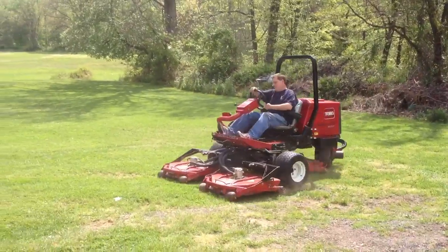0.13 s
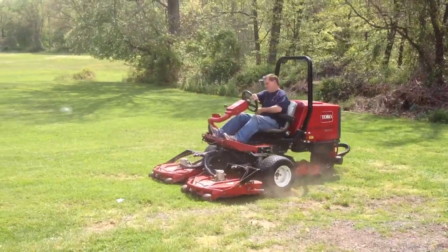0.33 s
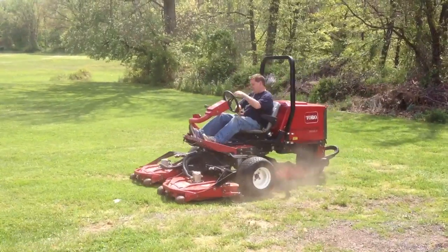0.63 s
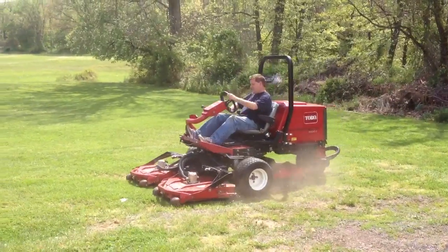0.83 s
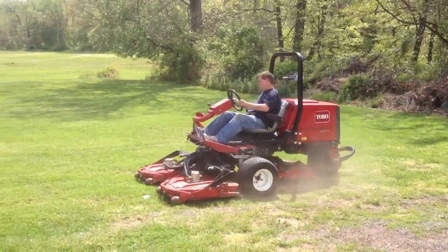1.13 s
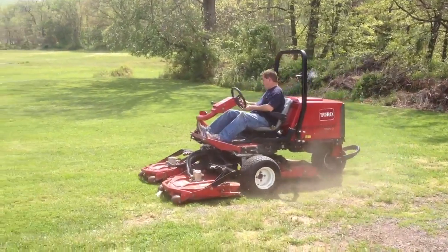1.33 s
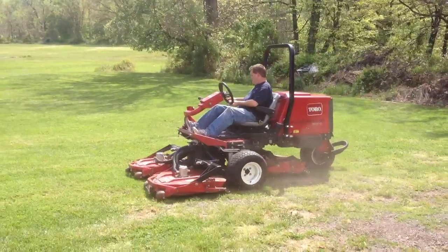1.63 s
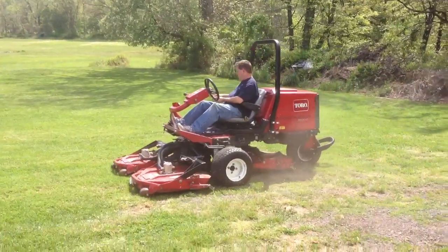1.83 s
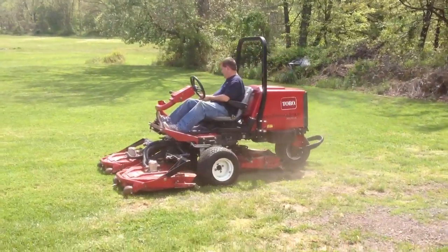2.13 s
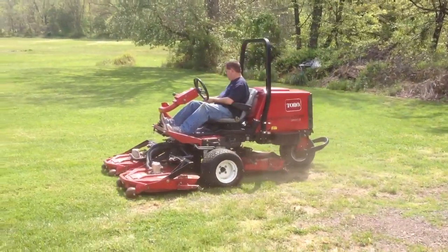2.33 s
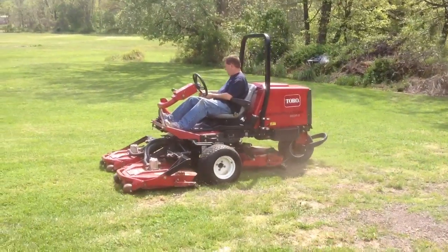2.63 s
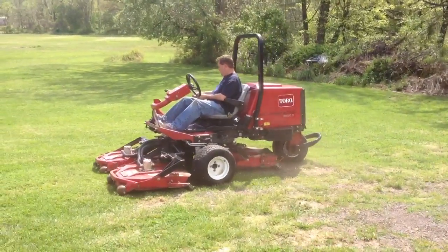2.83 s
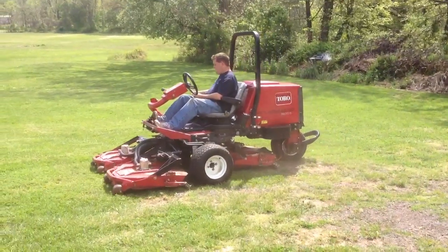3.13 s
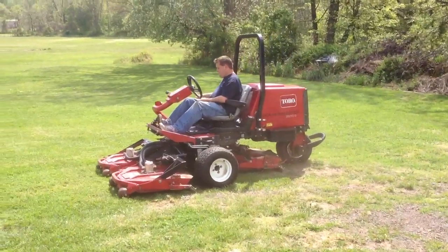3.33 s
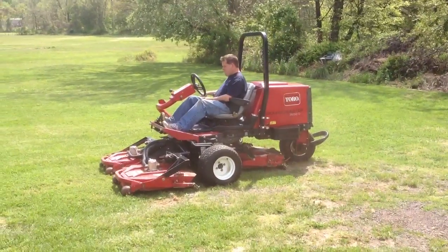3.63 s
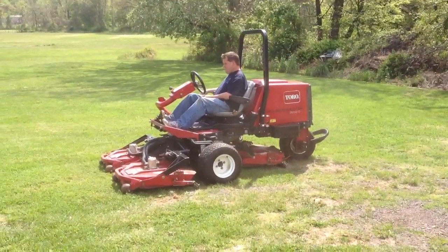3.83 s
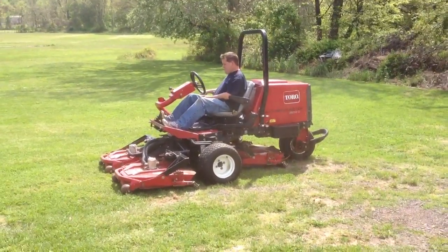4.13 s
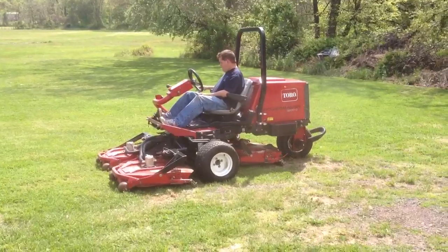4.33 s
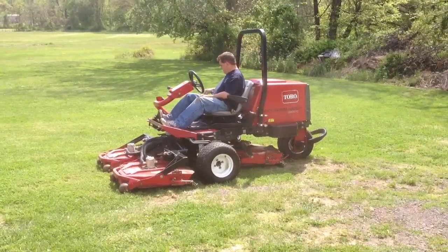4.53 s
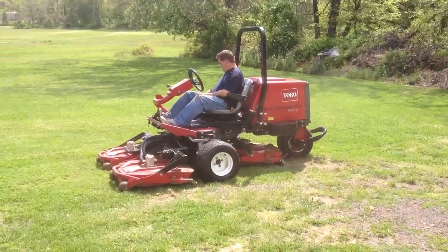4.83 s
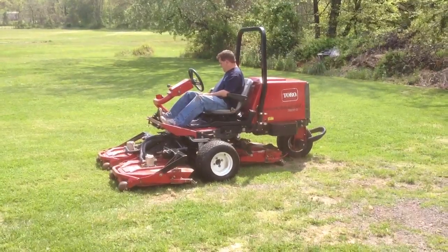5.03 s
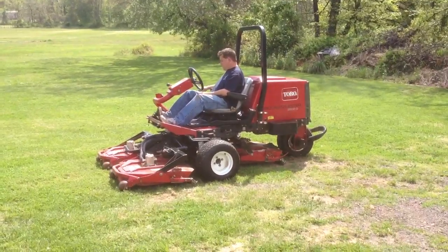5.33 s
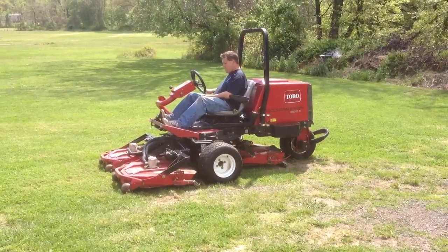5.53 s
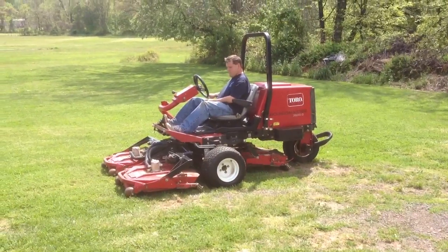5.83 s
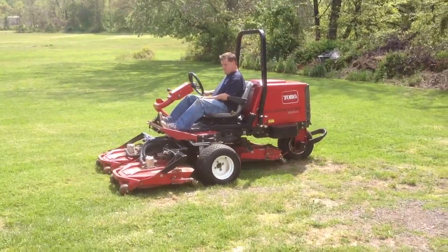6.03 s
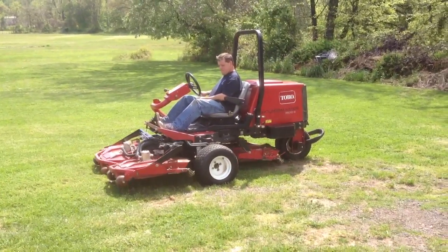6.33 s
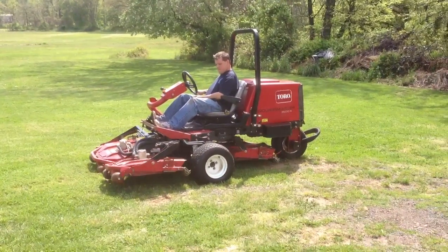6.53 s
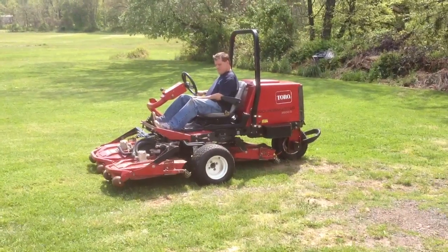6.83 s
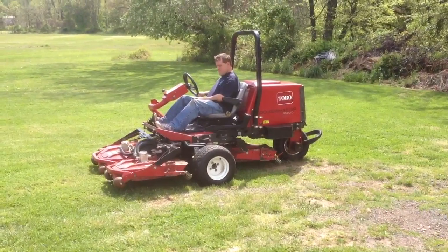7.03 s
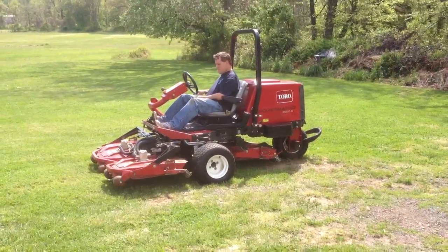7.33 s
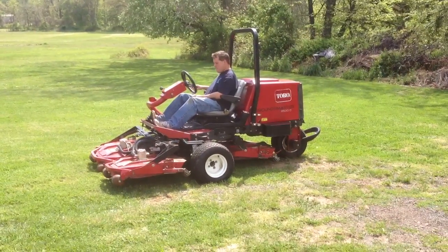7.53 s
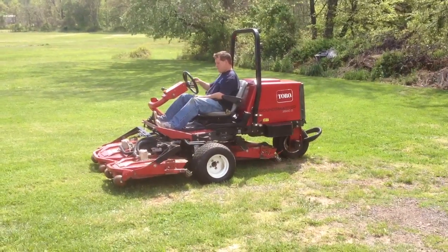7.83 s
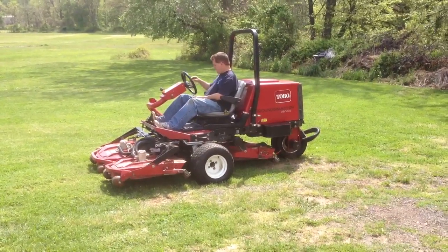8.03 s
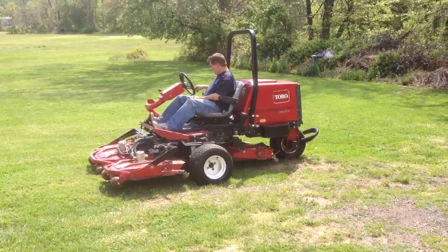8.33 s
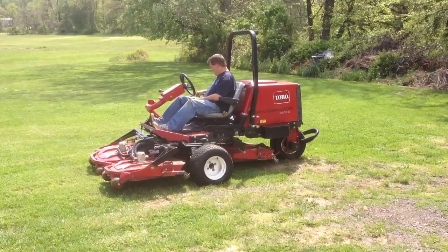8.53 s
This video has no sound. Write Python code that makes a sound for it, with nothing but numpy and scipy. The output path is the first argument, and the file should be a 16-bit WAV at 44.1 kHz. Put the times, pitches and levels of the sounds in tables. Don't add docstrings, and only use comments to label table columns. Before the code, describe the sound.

Loud mower decks and rumbling engine under gusty wind blasts; blades switch off midway, a lever clanks, and the quieter engine runs on.

```python
import sys
import numpy as np
from scipy import signal
from scipy.fft import rfft, irfft, next_fast_len
from scipy.io import wavfile
from scipy.ndimage import uniform_filter1d

SR = 44100
rng = np.random.default_rng(int(sys.argv[2]) if len(sys.argv) > 2 else 0)


def gain_from_db(level_db):
    decades = np.asarray(level_db, float) / 20
    return 10 ** decades


def store_wav(level_fs):
    pcm = np.round(np.clip(np.atleast_2d(level_fs), -1, 1) * 32767)
    wavfile.write(sys.argv[1], SR, pcm.T.astype(np.int16))


N = 382347

# (time [s], level [dB])
DECKS = [
    (0, -31.5),
    (.43, -32.5),
    (.8, -31),
    (1.57, -29),
    (2.28, -28.5),
    (2.5, -36),
    (3.0, -34.5),
    (3.5, -35.5),
    (4.8, -34.5),
    (5.05, -33.5),
]
# (time [s], pitch [Hz], level [dB])
MOTOR = [(.3, 364, -37.5), (1, 365.2, -32.5), (2.2, 369.6, -29.5), (3.2, 374.5, -31.5), (3.9, 369.3, -35),
         (4.94, 369.5, -31), (5.06, 367.8, -40), (5.15, 368, -33), (5.32, 370, -33), (5.45, 370, -42)]
# (centre [Hz], width [Hz], boost [dB])
PANELS = [(800, 525, 13.5), (1456, 335, 8), (2098, 176, 5.5), (2246, 59, 9), (3830, 240, 6), (4870, 730, 7),
          (7265, 550, 10), (8064, 530, 12.5), (7500, 110, 7), (7910, 95, 5), (8700, 400, 3),
          (9180, 200, -9), (9830, 700, 1.5), (13400, 1300, -0.5)]
MEAN_RUSH_DB = -31
FIRING_HZ = 72.63


def rms_one(x):
    return x / np.sqrt(np.mean(x ** 2) + 1e-20)


def in_time(rows):
    s, *columns = np.transpose(rows)
    return [np.interp(np.arange(N) / SR, s, c) for c in columns]


def while_on(rows):
    end_s, end_hz = rows[-1][:2]
    return in_time([*rows, (end_s + .06, end_hz, -90)])


def drift(rate):
    r = np.exp(-80 * np.pi * rate / SR)
    noise = rng.standard_normal(N // 40 + 2002)
    slow = signal.lfilter([1], [1, -2 * r, r * r], noise)[2000:]
    return np.interp(np.arange(N) / 40, np.arange(len(slow)), rms_one(slow - slow.mean()))


def coloured(slope, panels=(), source=None, ripple_db=0):
    size = next_fast_len(N)
    hz = np.arange(size // 2 + 1) * SR / size + 1e-3
    at, db = np.transpose(slope)
    shape_db = np.interp(np.log(hz), np.log(at), db, left=-120, right=-120)
    ripple = np.interp(hz / 22, np.arange(1100), rng.standard_normal(1100))
    shape_db = shape_db + ripple_db * ripple
    for centre, width, boost_db in panels:
        shape_db = shape_db + boost_db / (1 + (2 * (hz - centre) / width) ** 2)
    source = rng.standard_normal(N) if source is None else source
    return rms_one(irfft(rfft(source, size) * gain_from_db(shape_db), size)[:N])


def band(x, low_hz, high_hz):
    edges = [low_hz, min(high_hz, .45 * SR)]
    return signal.sosfilt(signal.butter(2, edges, "band", fs=SR, output="sos"), x)


def evened(x, window_s):
    return x / np.sqrt(uniform_filter1d(x ** 2, round(window_s * SR)) + 0.3)


def bump(s, length_ms):
    half = length_ms * SR / 2000
    first, last = max(0, int(s * SR - 4 * half)), min(N, int(s * SR + 4 * half))
    at = np.arange(first, last)
    return at, np.exp(-np.log(2) / 2 * ((at - s * SR) / half) ** 2)


def bells(rows):
    power = np.zeros(N)
    for s, db, length_ms in rows:
        at, bell = bump(s, 0.74 * length_ms)
        power[at] += (gain_from_db(db) * bell) ** 2
    return np.sqrt(power)


def tone(hz, rough, waver_rate):
    phase = 2 * np.pi * np.cumsum(hz) / SR + rough * drift(waver_rate)
    return np.sqrt(2) * np.sin(phase) * gain_from_db(2.4 * rough * drift(waver_rate))


def firing(depth):
    turns = np.cumsum(FIRING_HZ * (1 + 0.0055 * drift(1.7))) / SR
    cylinder = gain_from_db(np.array([0., -3., -1.5]))[turns.astype(int) % 3]
    return rms_one(1 + depth * cylinder * np.exp(-3.5 * (turns % 1)))


def blade_speed():
    off_s, coast_s = 4.935, .94
    return np.exp(-np.maximum(np.arange(N) / SR - off_s, 0) / coast_s)


def decks():
    # (frequency [Hz], density [dB per Hz])
    thrum_slope = [(24, -87), (40, -91), (139, -4), (209, -5.5), (337, -5.5), (373, -6), (413, -10),
                   (600, -24), (780, -30), (1320, -120)]
    rush_slope = [(400, -16), (700, -7.5), (1100, -3.5), (2000, -6.5), (3200, -12.5), (5000, -13.5),
                  (6300, -19), (9000, -31.5), (15000, -36)]
    # (time [s], roughness [0-1])
    motor_rough = [(0, 1.0), (2.3, 1.0), (3.2, .35), (5.5, .3)]
    # (time [s], pitch [Hz], level [dB])
    beat_low = [(.3, 210.7, -45), (1, 210, -32), (2.2, 207.7, -34), (3.2, 212, -33.5), (4, 217.4, -40),
                (5, 215.5, -31.5)]
    beat_high = [(.3, 287, -32), (1, 283.5, -30.5), (2.2, 285.7, -26), (3.2, 283.7, -44), (4, 270, -38),
                 (4.85, 264.8, -33)]
    speed = blade_speed()
    work_db = in_time(DECKS)[0] - MEAN_RUSH_DB
    coast_db = 2.76 * 20 * np.log10(speed)
    rush_db = MEAN_RUSH_DB + work_db + coast_db
    thrum_db = -24.5 + 0.86 * work_db + coast_db
    shell_db = -28 + 1.46 * (work_db + coast_db)
    gusty = 0.86 * drift(7.8)

    rush = coloured(rush_slope, PANELS, ripple_db=1.5) * firing(0.15)
    shell = rms_one(band(rush, 355, 1014)) * gain_from_db(shell_db + gusty + 0.9 * drift(24))
    air = rms_one(band(rush, 1090, 6970)) * gain_from_db(rush_db + gusty + 0.5 * drift(26))
    thrum = coloured(thrum_slope) * gain_from_db(thrum_db - 6.0 + 2.5 * np.tanh(drift(9.4)))

    hz, level_db = while_on(MOTOR)
    hz = hz * speed
    octave = gain_from_db(-17.5) * tone(2 * hz, 0.84, 4.3)
    hum = gain_from_db(level_db) * (tone(hz, in_time(motor_rough)[0], 10) + octave)
    looped = cycle_pattern(hz)
    looped_rush = coloured(rush_slope, PANELS, source=looped)
    hum = hum + gain_from_db(rush_db - 5) * rms_one(band(looped_rush, 1480, 3500))
    hum = hum + gain_from_db(thrum_db - 11) * coloured(thrum_slope, source=looped)
    for rows in (beat_low, beat_high):
        hz, level_db = while_on(rows)
        hum = hum + gain_from_db(level_db) * tone(hz, 1.2, 10)
    return thrum + shell + air + hum + gain_from_db(rush_db) * gear_whine(speed)


def cycle_pattern(hum_hz):
    turns = np.cumsum(hum_hz / 15) / SR
    orders = gain_from_db(3.5 * rng.standard_normal(301)) * np.exp(2j * np.pi * rng.random(301))
    return np.interp(turns % 1, np.arange(600) / 600, irfft(orders), period=1)


def gear_whine(speed):
    # (time [s], tooth rate [Hz])
    tooth_rate = [(2.2, 421.8), (3.4, 427.3), (4.9, 426.2)]
    # (multiple of the tooth rate, level against the air rush [dB])
    gear_orders = [(7, -29), (8, -31), (9, -26), (10, -29)]
    hz = in_time(tooth_rate)[0] * speed * (1 + .0012 * drift(5))
    phase = 2 * np.pi * np.cumsum(hz) / SR
    return np.sqrt(2) * sum(gain_from_db(db) * np.sin(k * phase) for k, db in gear_orders)


def blade_passes():
    # (multiple of a third of the motor pitch, level against the motor [dB])
    blade_orders = [(5, -15), (7, -15)]
    hz, level_db = while_on(MOTOR)
    speed = blade_speed()
    third = hz * speed / 3
    return gain_from_db(level_db) * speed * sum(gain_from_db(db) * tone(k * third, 1.1, 9) for k, db in blade_orders)


def engine():
    # (time [s], level [dB])
    effort = [
        (0, -50),
        (.46, -43),
        (2, -42),
        (3, -39.5),
        (3.9, -35),
        (4.8, -33.5),
        (5.1, -44),
        (6, -40.5),
        (8.67, -43),
    ]
    # (frequency [Hz], density [dB per Hz])
    rumble_slope = [(40, -59), (80, -7), (130, 1), (200, 6), (320, -2.5), (450, -16.5), (700, -59)]
    clatter_slope = [(300, -39), (600, -3), (1100, -9.5), (2000, 2.5), (3200, -5), (5000, -9.5),
                     (6500, -18), (9000, -34)]
    hiss_slope = [(4000, 0), (6000, -7.5), (8000, -3.5), (9200, 1), (11700, -9), (12800, -4), (14400, -2.5),
                  (15500, -11)]
    # (pitch [Hz], level [dB])
    pump_whines = [(380, -57), (655, -55), (861, -56.5), (7900, -77)]
    rumble_db, clatter_db = -38, in_time(effort)[0]
    loaded_db = 4.5 + 0.29 * (in_time(DECKS)[0] - MEAN_RUSH_DB)
    hiss_db = -51 + loaded_db * blade_speed() ** 10.0

    rumble = coloured(rumble_slope) * gain_from_db(rumble_db + 2.1 * drift(24))
    clatter = coloured(clatter_slope, PANELS, ripple_db=-0.5) * firing(0.58)
    clatter = clatter * gain_from_db(clatter_db + 1.0 * drift(30))
    hiss = coloured(hiss_slope, PANELS, ripple_db=4.5) * firing(.2) * gain_from_db(hiss_db + 0.37 * drift(26))
    whine = sum(gain_from_db(db) * tone(np.full(N, hz), 1.1, 8) for hz, db in pump_whines)
    pulses = exhaust_pulses()
    beat = gain_from_db(rumble_db - 7.0) * coloured(rumble_slope, source=pulses)
    knock = gain_from_db(clatter_db - 34.0) * coloured(clatter_slope, PANELS, source=pulses)
    return rumble + clatter + hiss + whine + beat + knock


def exhaust_pulses():
    turns = np.cumsum(FIRING_HZ * (1 + .002 * drift(2.18))) / SR
    at = np.flatnonzero(np.diff(turns.astype(int)))
    cylinder_db = np.array([0., -5., -2.5])[np.arange(len(at)) % 3]
    clicks = np.zeros(N)
    clicks[at] = gain_from_db(cylinder_db + 1.2 * rng.standard_normal(len(at)))
    return clicks


def squeaks():
    # (time [s], length [ms], pitch [Hz], level [dB], overtones [dB], roughness [0-1])
    rubs = [(0.587, 27, 2190, -19.5, -31, 0.2), (.572, 11, 2560, -29, -4, 0.74),
            (.588, 18, 2640, -26, -4, 0.44), (.592, 8, 3800, -34, -20, 0.7),
            (.68, 11, 2240, -24.5, -11, 1.05), (.91, 4.5, 1850, -29.5, 2.5, 0.2),
            (.918, 7.9, 1880, -27.5, -22, 0), (1.005, 25, 1855, -28.5, -5, 0.37),
            (1.035, 12, 2100, -29, -20, 0.2), (1.03, 27, 2840, -30.5, -20, 0.8),
            (1.03, 28, 2343, -32.5, 1.5, 1.1), (5.78, 7.7, 2950, -39, -25, 1)]
    out, grip = np.zeros(N), drift(99)
    for s, length_ms, hz, db, overtone_db, rough in rubs:
        at, bell = bump(s, length_ms)
        phase = 2 * np.pi * hz * at / SR
        slip = rough * (grip[at] + 1.2 * grip[3 * at % N])
        overtones = 0
        for k in (2, 3, 4, 5):
            if k * hz < .35 * SR:
                strength = (1.8 if k == 3 else 1) / (k - 1) ** 2.6
                overtones = overtones + strength * np.sin(k * phase + 1.2 * slip)
        level = np.sqrt(2) * gain_from_db(db + 1.8 * grip[at - 900])
        out[at] += level * bell * (np.sin(phase + slip) + gain_from_db(overtone_db) * overtones)
    return out


def scuffs():
    # (time [s], level [dB], length [ms], centre [Hz])
    rattles = [(0.171, -28, 78, 3130), (0.286, -27, 21, 2500), (.585, -28, 25, 5200), (.68, -36, 13, 3080),
               (.355, -34.5, 8.6, 4700), (1.02, -31, 23, 4870), (1.355, -22.5, 12, 2500),
               (1.649, -28, 10, 1200), (2.33, -47, 39, 6000), (2.948, -31, 3.2, 8000),
               (2.959, -34, 11, 8000), (.135, -38, 4.6, 5000), (.205, -32.5, 8.7, 3500),
               (.232, -35, 6, 3500), (.395, -39, 4, 6000), (.512, -42, 5, 6000), (.805, -40, 4, 2600),
               (.83, -37, 5, 2600), (5.512, -45, 8, 2000), (5.594, -40, 10, 4500), (5.78, -41, 9, 2300),
               (5.592, -45.5, 15, 11500), (6.47, -45, 14, 5000), (7.355, -45, 12, 6000)]
    out, noise = np.zeros(N), coloured([(500, 12.5), (16000, -11)], PANELS)
    for s, db, length_ms, centre_hz in rattles:
        at, bell = bump(s, length_ms)
        out[at] += gain_from_db(db) * bell * rms_one(band(noise[at], centre_hz / 2.04, centre_hz * 1.98))
    return out


def lever():
    # (time [s], blow [dB], chatter t60 [s])
    clanks = [
        (5.972, -12, 0.15),
        (6.01, -20, 0.11),
    ]
    # (mode [Hz], level [dB], t60 [s])
    lever_modes = [(620, -33, .02), (890, 6.5, 0.017), (1000, -9, 0.018), (1415, 3.5, 0.019),
                   (1690, 2, 0.014), (2045, 8.5, 0.022), (2500, 1, 0.0087), (2850, 2.5, 0.014),
                   (3640, 1.5, 0.0091), (4280, 0, 0.011), (4700, -7, 0.039), (5448, -34, .008)]
    # (time [s], pitch [Hz], level [dB])
    spring = [
        (6.005, 696, -52),
        (6.02, 710, -31),
        (6.05, 800, -34),
        (6.085, 900, -45),
        (6.1, 880, -55),
    ]
    t, chatter = np.arange(N) / SR, np.zeros(N)
    for s, db, t60 in clanks:
        since = np.maximum(t - s, 0)
        chatter += gain_from_db(db - 60 * since / t60) * (1 - np.exp(-(since / 0.0047) ** 2))
    chatter = chatter * rng.standard_normal(N) + 1e-18
    out = gain_from_db(-19) * band(band(chatter, 600, 7200), 400, 9000)
    for hz, db, t60 in lever_modes:
        r, w = gain_from_db(-60 / (t60 * SR)), 2 * np.pi * hz / SR
        ring = signal.lfilter([0, np.sin(w)], [1, -2 * r * np.cos(w), r * r], chatter)
        out = out + gain_from_db(db - 30.5) * ring
    hz, level_db = in_time(spring)
    twang = (t > spring[0][0]) & (t < spring[-1][0])
    return band(out, 380, 15000) + twang * gain_from_db(level_db) * tone(hz, 0.58, 40)


def wind():
    # (time [s], level [dB])
    breeze = [(0, -23.5), (.26, -28), (.32, -45), (1.05, -46), (2.1, -40), (2.3, -30), (2.45, -24),
              (2.56, -21), (2.67, -23.5), (2.85, -23.5), (3.3, -25.5), (3.7, -36), (5.5, -55), (6.4, -42.5),
              (6.8, -47), (7.1, -37.5), (7.4, -26.5), (7.68, -28), (7.78, -43), (7.98, -31.5), (8.1, -24),
              (8.18, -30), (8.3, -26), (8.67, -31.5)]
    # (time [s], level [dB], length [ms], crackle above the thump [dB])
    gusts = [(.044, -13, 29, -3), (.105, -18, 69, -0.5), (.15, -18, 50, 1.5), (.23, -13.5, 43, -1),
             (.493, -23.5, 22, -11), (1.365, -22.5, 64, 2.5), (2.285, -19.5, 43.8, 6.5), (2.38, -20, 33, 6),
             (2.41, -15.5, 29, 2), (2.449, -8.5, 22, -5), (2.485, -16.5, 42, -4.5), (2.79, -19, 56, 0.5),
             (2.88, -15, 22, -2), (8.487, -19, 24, 0.5), (3.467, -18, 75, -16), (5.9, -25.5, 51, -26),
             (6.543, -25, 49, -22), (6.606, -25.5, 66, -10.5), (7.054, -22.5, 13, -11),
             (7.231, -16.5, 40, -13), (7.286, -15.5, 33, -2.5), (7.399, -13.5, 27, -12),
             (7.548, -14.5, 39, -12), (7.587, -10.5, 27, -8), (7.626, -15, 44, -2.5), (7.653, -16, 18, -13),
             (7.828, -24, 32, -25), (8.31, -18, 28, -16), (8.394, -15.5, 23, -5), (8.599, -16, 22, 3)]
    # (time [s], level [dB], crackle above the thump [dB])
    slaps = [(.024, -21, -14), (.068, -13, -5), (0.181, -9, -14), (0.267, -12, -4), (8.08, -17.5, -22),
             (6.819, -34, -21), (2.319, -24.5, 15), (2.603, -22, 6.5), (2.625, -19.5, 6),
             (2.703, -14.5, -1), (2.817, -21.5, 9.5), (2.984, -12, -4), (3.005, -19.5, 7.5),
             (3.065, -14.5, -10), (3.185, -17, -25), (3.223, -17.5, -23), (3.291, -13.5, -7.5),
             (2.927, -17.5, -2), (4.617, -13, -18), (4.864, -19.5, -20), (4.99, -11.5, 0),
             (5.374, -19, -21), (5.63, -31, -12), (5.771, -24.5, -25), (7.321, -26, 2), (7.264, -21.5, -5),
             (7.538, -28, -3.5), (8.048, -17, -25), (8.246, -13, -27), (8.264, -16.5, 0), (8.473, -9, 1),
             (8.534, -22, -10)]
    # (time [s], level [dB], length [ms])
    tears = [(.168, -33, 7), (.186, -8, 7.4), (1.371, -43, 15), (2.27, -33, 18), (2.293, -19, 31),
             (2.32, -14, 29), (2.446, -25.5, 51), (2.605, -29, 12), (2.706, -22, 21), (2.39, -28, 20),
             (2.64, -28, 12), (2.762, -34, 12), (2.79, -45, 20), (2.88, -34, 14), (3.003, -27, 13.7),
             (3.075, -30, 12), (7.22, -35, 12), (7.295, -34, 18)]
    # (frequency [Hz], density [dB per Hz])
    thump_slope = [(20, -67), (50, -58), (90, -13), (140, 4), (220, 7), (350, -1), (600, -12), (1200, -54)]
    crackle_slope = [(250, -9), (450, 7), (800, 0), (1300, -10), (2200, -29), (4000, -59)]
    edge_slope = [(900, 12), (1500, 6), (2500, -4.5), (4000, -17.5), (8000, -49)]
    eddies = rng.standard_normal(N) * gain_from_db(6.95 * drift(92))
    slap_ms = 14.4
    puffs = gusts + [(s, db, slap_ms, crackle_db) for s, db, crackle_db in slaps]
    buffet = gain_from_db(in_time(breeze)[0] + 5.5 * drift(19.6))
    swell = bells([row[:3] for row in puffs])
    rough = bells([(s, db + crackle_db, 0.96 * ms) for s, db, ms, crackle_db in puffs])
    rasp = bells(tears)

    thump = np.hypot(swell, buffet) * evened(coloured(thump_slope), 0.0117)
    crackle = np.hypot(rough, gain_from_db(-16) * buffet) * evened(coloured(crackle_slope, source=eddies), 0.0067)
    edge = np.hypot(rasp, gain_from_db(-41) * rough) * evened(coloured(edge_slope, source=eddies), 0.0057)
    return thump + crackle + edge


def pops(air):
    # (time [s], peak [dB], half width [ms])
    dips = [(0.0258, -7, 0.51), (0.0443, -4, 0.78), (.0667, -4, 0.9), (0.182, -2, 0.67),
            (0.2381, -2.5, 0.39), (1.2008, -9, .4), (1.348, -7.5, .5), (1.6516, -13, 0.27),
            (2.2693, -4, .5), (2.3019, -2, 0.29), (2.4042, -5, 0.59), (2.4145, -5, 0.67),
            (2.4426, -9, 0.45), (2.485, -8, 0.82), (2.6184, -7.5, 0.34), (2.701, -5.5, 0.45),
            (2.741, -11, 0.35), (2.8157, -3.5, .45), (2.8787, -7, 0.47), (2.9859, -4, 0.66),
            (3.0037, -7, 0.73), (3.1838, -9, 0.84), (3.222, -10, 0.8), (4.616, -24, .7), (4.991, 0.5, 0.62),
            (5.37, -20, .7), (5.6311, -21.5, .7), (5.9137, -21, 0.65), (6.5482, -12.5, 0.87),
            (6.817, -24, 0.96), (7.184, -16.5, 1), (7.2171, -10, 0.41), (7.277, -8, 0.76),
            (7.2868, -5, 0.91), (7.2979, -11, 0.71), (7.3198, -11, 0.36), (7.3322, -12, 0.74),
            (7.366, -11, 0.98), (7.3915, -16, 0.81), (7.4068, -8.5, 0.53), (7.4455, -28, .7),
            (7.5444, -14, .6), (7.5632, -16, 0.64), (7.5835, -3.5, 0.74), (7.5935, -10, .7),
            (7.6236, -5, .6), (7.6484, -10, 0.6), (8.059, -8, 0.56), (8.0748, -14, 0.88),
            (8.2215, -15, 0.79), (8.2483, -11, 1), (8.2625, -7, 0.63), (8.3037, -12, 0.86),
            (8.3707, -13, 0.37), (8.3849, -8, 0.58), (8.4086, -8, 0.75), (8.4712, -6, 0.61),
            (8.5351, -16, 0.6), (8.5956, -4.5, 0.52), (8.6064, -9, 0.8)]
    hush_ms = 2.2
    out, hush, reach = np.zeros(N), np.ones(N), np.arange(-300, 301)
    for s, db, half_ms in dips:
        u = reach / (half_ms * SR / 1000)
        at = round(s * SR) + reach
        out[at] -= gain_from_db(db) * (1 - u ** 2) * np.exp(-u ** 2 / 2)
        hush[at] *= 1 - np.exp(-(reach / (hush_ms * SR / 1000)) ** 2)
    return signal.sosfilt(signal.butter(3, 70, "high", fs=SR, output="sos"), air * hush + out)


def scene():
    air = wind()
    air = pops(air - .25 * band(air ** 2, 110, 3000))
    return (decks() + engine() + squeaks() + scuffs() + lever() + blade_passes() + air)[None]


def treble_holes(x):
    # (frequency [Hz], share of the time [0-1])
    dropouts = [(5600, .0), (6200, .04), (6600, .0), (8900, .01), (9150, .3), (9500, .03), (10250, .14),
                (11200, .04), (11550, .45), (11900, .02), (13350, .01), (13550, .25), (13750, .02),
                (14200, .04)]
    # (start [s], end [s], low [Hz], high [Hz], share [0-1])
    thin_stretches = [(0, 2.33, 13300, 14300, .55), (6.02, 8.67, 14750, 15400, .58)]
    window, pad = signal.windows.cosine(2048), 1024 - 885
    hz, s, frames = signal.stft(np.pad(x[0], (pad, 0)), SR, window, 2048, 1024)
    share = np.interp(hz, *np.transpose(dropouts), left=0)[:, None] * np.ones(len(s))
    for t0, t1, low, high, more in thin_stretches:
        share[np.ix_((hz > low) & (hz < high), (s > t0) & (s < t1))] = more
    luck = rng.standard_normal((len(hz) // 8 + 1, len(s)))
    luck = uniform_filter1d(luck, size=4, axis=1)
    rank = luck.ravel().argsort().argsort().reshape(luck.shape) / luck.size
    frames = frames * (np.repeat(rank, 8, axis=0)[:len(hz)] >= share)
    return signal.istft(frames, SR, window, 2048, 1024)[1][None, pad:pad + N]


def roll_off(x):
    return signal.sosfilt(signal.butter(12, 15320, fs=SR, output="sos"), x)


def record(dry):
    ceiling = .709
    dry = signal.sosfilt(signal.butter(2, 42, "high", fs=SR, output="sos"), dry)
    squeezed = dry / (1 + np.abs(dry / ceiling) ** 6) ** (1 / 6)
    squeezed = signal.sosfilt(signal.ellip(12, .3, 60, 15320, fs=SR, output="sos"), squeezed)
    mix = treble_holes(squeezed)
    return roll_off(mix)


dry = scene()
out = record(dry)
store_wav(out)
```